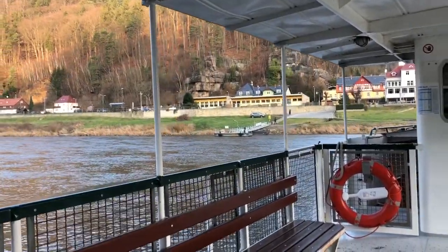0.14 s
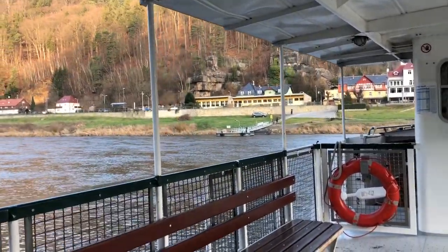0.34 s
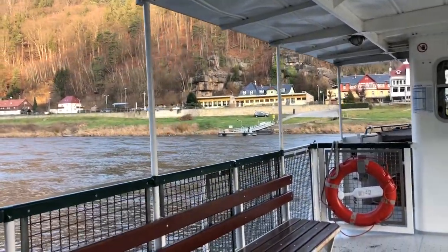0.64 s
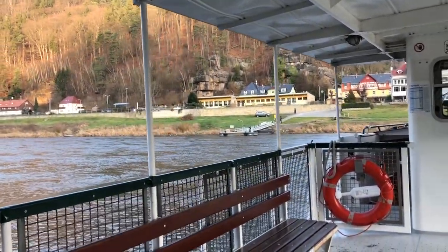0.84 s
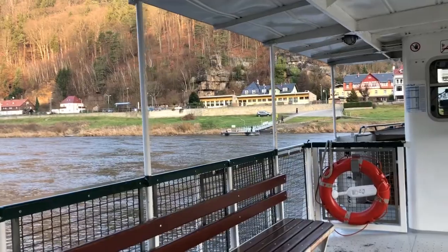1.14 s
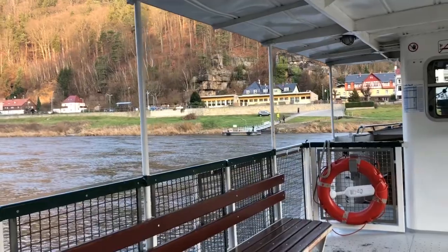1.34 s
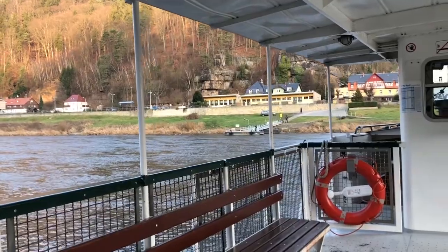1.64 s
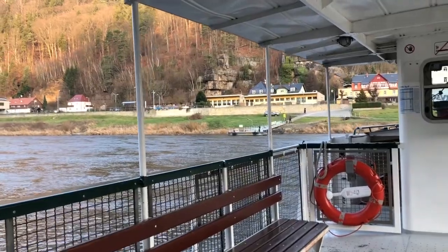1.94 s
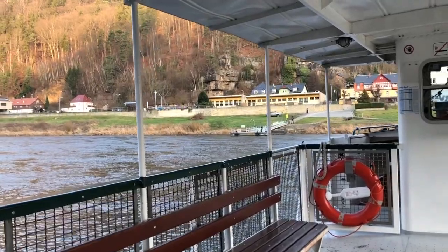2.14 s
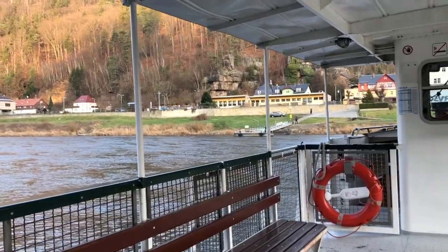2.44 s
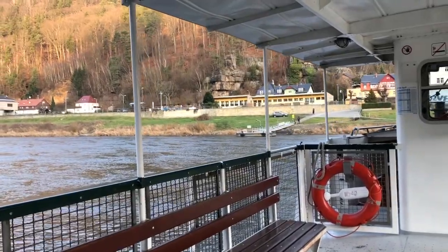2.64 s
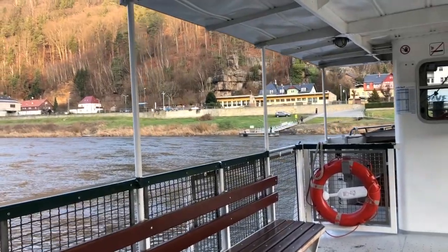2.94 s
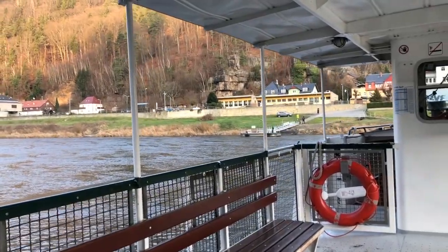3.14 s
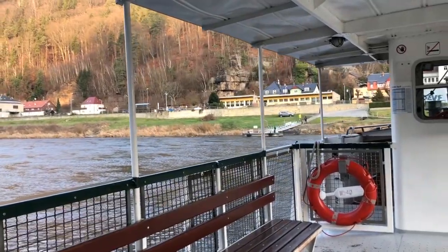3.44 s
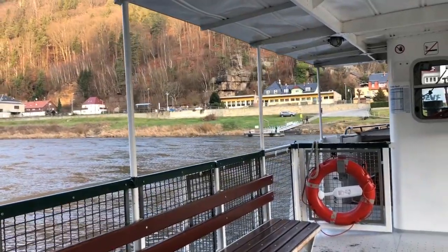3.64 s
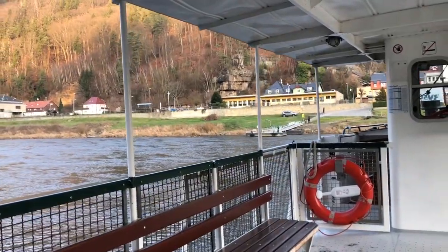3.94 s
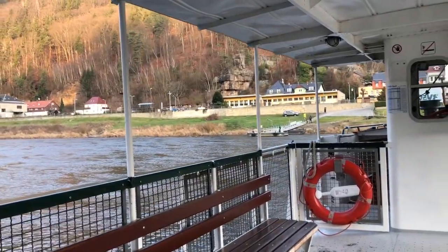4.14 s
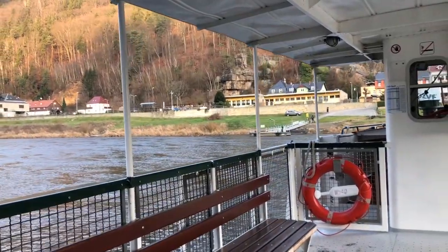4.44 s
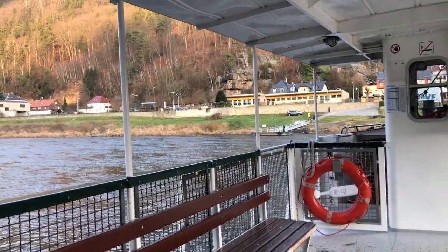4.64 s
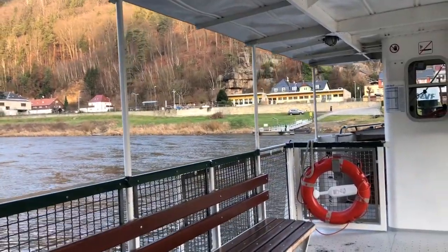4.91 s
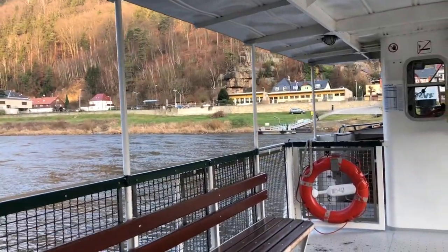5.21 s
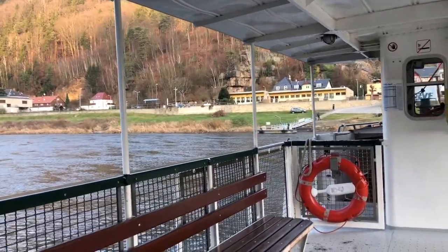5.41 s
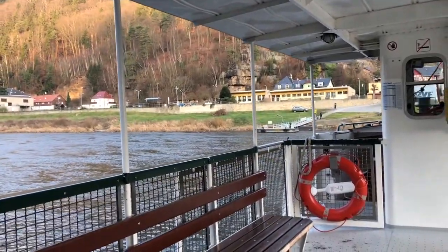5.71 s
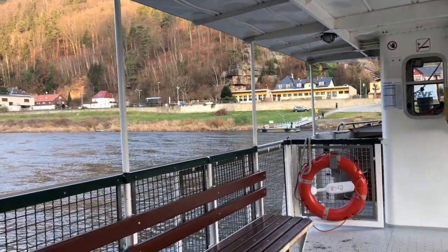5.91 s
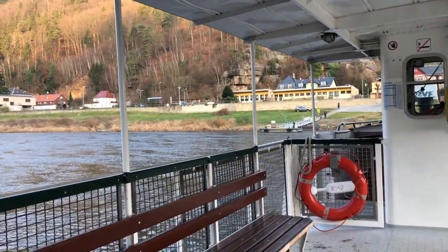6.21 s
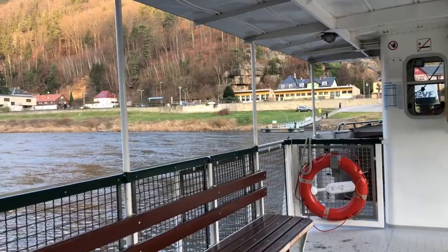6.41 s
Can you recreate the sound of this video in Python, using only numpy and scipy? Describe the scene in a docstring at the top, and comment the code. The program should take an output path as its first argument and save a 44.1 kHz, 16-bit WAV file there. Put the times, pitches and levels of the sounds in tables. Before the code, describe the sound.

Close, mono wind noise dominates: deep rumble, dull thuds, raspy flaps and sharp cracks at uneven intervals. A low boat engine and soft hull wash hum continuously behind, with a very faint, regular high hiss about six times a second. A calmer stretch between one and two and a half seconds exposes the boat, then gusts grow until the loudest burst at the end.

```python
"""Wind gusts buffet a microphone on the open deck of a moving river ferry.
From the start, noise shaped like engine drone and wash runs under wavering machine tones and rumbling wind.
A faint hiss soon joins in regular pulses, and single eddies slap the port with short swings of pressure.
After about a second the wind eases, then builds up again in waves and is strongest at the end.
The hardest slaps crack, and a limiter rounds off whatever overloads the microphone."""
import sys
import numpy as np
from scipy import signal
from scipy.fft import rfft, irfft, next_fast_len
from scipy.io import wavfile
from scipy.ndimage import uniform_filter1d, minimum_filter1d

SR = 44100
rng = np.random.default_rng(int(sys.argv[2]) if len(sys.argv) > 2 else 0)


def wav_record(signal):
    """Record a signal, one row per channel, as 16-bit PCM in the file named by sys.argv[1]."""
    frames = np.transpose(np.atleast_2d(signal))
    bounded = np.clip(frames, -1, 1)
    # unit amplitude maps onto the largest positive 16-bit level
    quanta = np.round(bounded * 32767).astype(np.int16)
    wavfile.write(sys.argv[1], SR, quanta)


N = 289737
TIME = np.arange(N) / SR   # s

# Strength of the wind flowing past the microphone: (time [s], level [dB])
WIND_STRENGTH = [(0, -20.5), (0.5, -20), (0.95, -23), (1.35, -29), (1.85, -27), (2.4, -28), (2.8, -21.5),
                 (3.1, -24.5), (3.6, -18.5), (4.1, -21.5), (4.35, -23), (4.8, -23), (5.15, -17), (5.5, -15),
                 (5.95, -20.5), (6.25, -14.5), (6.57, -9)]
# The strongest eddies sweeping over the port:
# (time [s], level [dB], decay [s], brightness [dB per octave], peak of the core above the level [dB])
STRONG_EDDIES = [(0.144, -17, .011, -1.5, -16), (0.162, -7, 0.0043, 8.5, -2), (0.259, -11.5, .0034, 6, -10),
                 (0.361, -16.5, .012, 1.5, 11), (0.431, -20.5, 0.021, 3, -3), (0.528, -17, 0.0047, 4.5, 10),
                 (0.573, -18, 0.0033, -7, 7), (0.703, -16.5, 0.011, -5, 8), (0.732, -17, 0.0044, 3.5, 9.5),
                 (0.844, -26, 0.017, 4, -7), (0.891, -18, 0.0044, 1, 2), (0.950, -17.5, .0035, 6, -1),
                 (1.016, -21, 0.015, -2, -7), (1.137, -29, 0.017, -1.5, -2), (1.546, -25, 0.024, -6, 8),
                 (1.579, -21, 0.0036, 8, -4), (2.052, -29, 0.026, -8, -7), (2.432, -20, 0.011, -0.5, -7),
                 (2.486, -26.5, .016, -2.5, 2), (2.658, -27.5, 0.0051, -12.5, -6),
                 (2.985, -24, 0.0024, 0.5, 10.5), (3.136, -15, 0.0082, 4.5, 9),
                 (3.258, -15.5, 0.0044, -1, 6.5), (3.457, -25, .012, -4, -3), (3.557, -16.5, 0.0036, -3, 2),
                 (3.618, -20, .005, -2, 4), (3.664, -20, 0.017, 1.5, 7), (3.792, -18.5, 0.0044, 4, 7),
                 (3.942, -26.5, 0.02, -2, -3), (4.008, -18.5, 0.0036, -4.5, 2),
                 (4.129, -17.5, 0.0032, 2, -14), (4.163, -16.5, 0.014, -0.5, 5),
                 (4.244, -24, 0.015, -3, -6), (4.407, -25, 0.015, -3.5, -1), (4.611, -24, 0.034, 0.5, -3),
                 (4.705, -17.5, 0.012, 1, 5), (4.853, -14, 0.0058, 1, 19), (4.879, -16, 0.0054, 3, 4),
                 (4.91, -17.5, 0.003, 2, 6), (4.992, -18.5, .008, -1.5, 0), (5.134, -7, 0.0044, -2.5, 1),
                 (5.16, -15.5, 0.012, 5.5, -3), (5.289, -18, 0.0035, -1, 4),
                 (5.453, -19.5, 0.0036, 14.5, -13), (5.469, -19, 0.017, 6, -3),
                 (5.506, -16.5, 0.015, 1.5, -3), (5.567, -14, 0.0096, 4.5, 4), (5.737, -6.5, 0.012, 4.5, 2),
                 (5.866, -23, 0.011, -4, -7), (6.066, -21, 0.015, 1, 13), (6.111, -22.5, 0.0076, 0, 5),
                 (6.198, -11.5, 0.015, 6, 7), (6.352, -15.5, 0.0061, 3.5, -4), (6.417, -10, 0.014, 4.5, 4),
                 (6.468, -15, 0.011, 5.5, 3), (6.494, -12, 0.012, 6.5, 6), (6.523, -9.5, 0.0058, 10, 2),
                 (6.556, -13, 0.014, 11.5, -4)]

# Noise spectra, from the deepest wind sound to the highest, then the boat and its hiss:
# (frequency [Hz], relative level [dB])
RUMBLE_SPECTRUM = [(20, -48), (31, -19), (48, -1.5), (68, 4.5), (100, -1.5), (125, -5), (180, -19)]
THUMP_SPECTRUM = [(75, -12), (115, -0.5), (150, 0.5), (220, -1), (310, -7), (420, -25.5)]
PORT_SPECTRUM = [(240, -20), (340, -2.5), (420, -1.5), (510, -1), (650, -7.5), (850, -16.5), (1200, -45)]
RASP_SPECTRUM = [(600, -9), (850, 12), (1150, 8.5), (1500, -0.5), (2100, -9), (3000, -38), (4500, -39),
                 (10000, -73)]
BOAT_SPECTRUM = [(25, -36), (45, -33), (75, -3.5), (130, -4), (260, -19), (350, -19), (580, -18),
                 (800, -16), (1150, -20.5), (1800, -22), (2600, -28), (3700, -34.5), (4500, -36.5),
                 (6200, -41.5), (9300, -45.5), (12500, -53.5), (15500, -55)]
HISS_SPECTRUM = [(2500, -31), (4200, 13), (6000, -13), (10000, -14), (11300, -5), (12000, 1), (12600, -2),
                 (13200, -13), (15500, -14)]
# Engine and machine tones: (frequency [Hz], level [dB], half-width [Hz])
MACHINE_TONES = [(72, -50, 9.7), (93, -45, 14), (268, -46.5, 6.7), (429, -48.5, 12), (598.6, -46, 6.3),
                 (1365.5, -51.5, 8.6), (1820, -55.5, 14), (2182, -54, 12), (2316, -56, 10),
                 (2458, -61.5, 9.6), (3220, -62, 28), (4108, -87, 25), (4300, -66.5, 38), (5000, -70, 8)]

BOAT_DB, HISS_DB = -32.5, -54.5
HISS_PERIOD_S, HISS_FIRST_S = 0.172, 0.077
CUTOFF_HZ = 15750

# Lesser eddies come at random: their rate, their level against the wind and its scatter
EDDIES_PER_S, EDDY_DB, EDDY_SCATTER_DB = 15, -8, 2.5
# Their basic decay, and their brightness and its scatter [dB per octave]
EDDY_DECAY_S, EDDY_TILT_DB, EDDY_TILT_SCATTER_DB = 0.0071, -2.5, 3.5

# The core of an eddy swings faster the brighter the eddy is: CORE_HZ holds at zero brightness
CORE_HZ, CORE_OCTAVES_PER_DB, CORE_CYCLES = 402, 0.17, 0.7

# The crack grows faster than the eddy: CRACK_DB is its peak at CRACK_ONSET_DB and zero brightness,
# CRACK_GROWTH is dB per dB of level, CRACK_PER_TILT is dB per dB of brightness
CRACK_DB, CRACK_GROWTH, CRACK_PER_TILT = -21, 1.74, 0.88
CRACK_ONSET_DB = -12
CRACK_HZ, CRACK_CYCLES = 1680, 0.47


def from_db(db):
    """Turn decibels into a gain."""
    return 10 ** (np.asarray(db) / 20)


def rms_one(x):
    """Scale a signal to unit power."""
    return x / np.sqrt(np.mean(x ** 2) + 1e-20)


def in_time(rows):
    """Join the rows of a table by straight lines, one curve per column."""
    s, *columns = np.transpose(rows)
    return [np.interp(TIME, s, column) for column in columns]


def shaped_noise(gain_at):
    """Make unit-power noise whose spectrum follows a function of frequency."""
    size = next_fast_len(N)
    hz = np.maximum(np.arange(size // 2 + 1) * SR / size, 1)
    spectrum = rfft(rng.standard_normal(size)) * gain_at(hz)
    return rms_one(irfft(spectrum, size)[:N])


def noise(colour):
    """Make unit-power noise with a tabled spectrum that falls away beyond its ends."""
    points, db = np.transpose(colour)

    def gain_at(hz):
        skirts = np.minimum(1, np.minimum(hz / points[0], points[-1] / hz)) ** 2
        return from_db(np.interp(np.log(hz), np.log(points), db)) * skirts

    return shaped_noise(gain_at)


def flutter(rate_hz, depth_db):
    """Make a random gain of unit power that changes at about the given rate."""
    wander = shaped_noise(lambda hz: 1 / (1 + (hz / rate_hz) ** 2) ** 2)
    return rms_one(from_db(depth_db * wander))


def deck(x, echo_db=-25, count=16):
    """Floor, roof and cabin wall send back faint early echoes that ripple the spectrum."""
    out = x.copy()
    for delay_s in rng.uniform(0.002, 0.025, count):
        out += from_db(echo_db) * np.roll(x, int(delay_s * SR))
    return rms_one(out)


def boat():
    """Broad drone of the engine, the uneven wash along the hull, and narrow, wavering machine tones."""
    bed = noise(BOAT_SPECTRUM)
    drone = signal.sosfiltfilt(signal.butter(2, 1200, fs=SR, output="sos"), bed)
    bright_part = bed - drone
    wash = np.std(bright_part) * deck(bright_part) * flutter(rate_hz=29, depth_db=0.84)
    out = from_db(BOAT_DB) * (drone + wash)
    for tone_hz, level_db, width_hz in MACHINE_TONES:
        # a narrow band of noise sounds like a tone that wavers
        tone = shaped_noise(lambda hz: 1 / (1 + ((hz - tone_hz) / width_hz) ** 2))
        out = out + from_db(level_db) * tone
    return out


def lesser_eddies(count=200, gust_follow=1.05):
    """Small whirls shed at uneven intervals, stronger in stronger wind; rows like STRONG_EDDIES, no core."""
    s = np.cumsum(rng.gamma(3, 1 / 3, count)) / EDDIES_PER_S
    size, tilt = np.clip(rng.standard_normal((count, 2)), -2, 2).T
    gust_s, gust_db = np.transpose(WIND_STRENGTH)
    mean_db = gust_db.mean()
    carried_db = mean_db + gust_follow * (np.interp(s, gust_s, gust_db) - mean_db)
    level_db = carried_db + EDDY_DB + EDDY_SCATTER_DB * size
    tilt_db = EDDY_TILT_DB + EDDY_TILT_SCATTER_DB * tilt
    rows = np.column_stack([s, level_db, np.full(count, EDDY_DECAY_S), tilt_db])
    return rows[s < N / SR]


def swells(eddies, octaves, stretch, lag_s, rise_share=0.6):
    """Power of the eddies in a band some octaves from the port's own: each rises fast and dies away."""
    power = np.zeros(N)
    for s, level_db, decay_s, tilt_db in eddies:
        near = slice(max(int(s * SR) - SR // 10, 0), int(s * SR) + SR // 4)
        age = (TIME[near] - s - lag_s) / (decay_s * stretch)   # in decay times from the peak
        shape = np.exp(-np.where(age < 0, (age / rise_share) ** 2, age))
        power[near] += from_db(level_db + octaves * tilt_db) ** 2 * shape
    return power


def steady(x, span_s):
    """Even out the power over a short span, so that wind and eddies set the loudness."""
    size = max(int(span_s * SR), 2)
    power = uniform_filter1d(uniform_filter1d(x ** 2, size), size)
    return rms_one(x / np.sqrt(np.abs(power) + 1e-3))


def turbulence(colour, flow_db, eddy_db, eddy_power, span_s):
    """Pressure noise whose power is that of the flow plus that of the eddies riding on it."""
    power = from_db(flow_db) ** 2 + from_db(eddy_db) ** 2 * eddy_power
    return np.sqrt(power) * steady(noise(colour), span_s)


def buffeting(flow_rumble_db=-7.0, flow_thump_db=-10, flow_port_db=-16, flow_rasp_db=-28):
    """Eddies rasp at the port first; the deeper thump and the longest, deepest rumble follow."""
    gust_db, = in_time(WIND_STRENGTH)
    eddies = np.vstack([np.array(STRONG_EDDIES)[:, :4], lesser_eddies()])
    flow_db = gust_db + 20 * np.log10(flutter(rate_hz=42, depth_db=3.5))
    rumble_db = gust_db + flow_rumble_db + 20 * np.log10(flutter(rate_hz=17, depth_db=3.5))

    rumble_swells = swells(eddies, -1.33, stretch=1.43, lag_s=0.01)
    rumble = turbulence(RUMBLE_SPECTRUM, rumble_db, -2.5, rumble_swells, span_s=0.086)
    thump_swells = swells(eddies, -0.6, stretch=1.04, lag_s=0.0027)
    thump = turbulence(THUMP_SPECTRUM, flow_db + flow_thump_db, 3.0, thump_swells, span_s=0.017)
    port_swells = swells(eddies, 0, stretch=0.96, lag_s=0)
    port = turbulence(PORT_SPECTRUM, flow_db + flow_port_db, -0.5, port_swells, span_s=0.0085)
    rasp_swells = swells(eddies, 1, stretch=0.6, lag_s=0)
    rasp = turbulence(RASP_SPECTRUM, flow_db + flow_rasp_db, -13.5, rasp_swells, span_s=0.011)

    # the air tears loose from the edge in quick, uneven flaps
    flaps = flutter(rate_hz=213, depth_db=3.0)
    return rumble + thump + flaps * (port + rasp * flutter(rate_hz=170, depth_db=3.5))


def pulsing_hiss(half_s=0.012):
    """Some turning part hisses briefly once in every revolution."""
    # time from the nearest pulse, before or after it
    from_pulse = (TIME - HISS_FIRST_S + HISS_PERIOD_S / 2) % HISS_PERIOD_S - HISS_PERIOD_S / 2
    pulses = np.exp(-(from_pulse / half_s) ** 2)
    return from_db(HISS_DB) * pulses * noise(HISS_SPECTRUM)


def add_swing(out, s, peak_db, swing_hz, cycles, phase):
    """Add one brief to-and-fro swing of pressure: a sine that swells and fades around time s."""
    near = slice(max(int((s - 10 / swing_hz) * SR), 0), int((s + 10 / swing_hz) * SR))
    turns = (TIME[near] - s) * swing_hz
    envelope = np.exp(-(turns / cycles) ** 2)
    out[near] += from_db(peak_db) * envelope * np.sin(2 * np.pi * turns + phase)


def slaps():
    """A passing vortex core swings the pressure once or twice; strong, bright ones crack the loudest."""
    out = np.zeros(N)
    all_phases = rng.uniform(0, 2 * np.pi, (len(STRONG_EDDIES), 2))
    for (s, level_db, _, tilt_db, core_db), phases in zip(STRONG_EDDIES, all_phases):
        core_hz = CORE_HZ * 2 ** (CORE_OCTAVES_PER_DB * tilt_db)
        add_swing(out, s, level_db + core_db, core_hz, CORE_CYCLES, phases[0])
        crack_db = CRACK_DB + CRACK_GROWTH * (level_db - CRACK_ONSET_DB) + CRACK_PER_TILT * tilt_db
        add_swing(out, s, crack_db, CRACK_HZ, CRACK_CYCLES, phases[1])
    return out


def scene():
    """Wind at the microphone over the running boat, as one channel."""
    return (boat() + buffeting() + pulsing_hiss() + slaps())[None, :]


def record(dry, ceiling=0.88, low_cut_hz=30):
    """The deepest bass is cut, a fast limiter rounds off the hardest buffets, and the top is cut."""
    dry = signal.sosfilt(signal.butter(4, low_cut_hz, "high", fs=SR, output="sos"), dry)
    size = SR // 900   # about a millisecond
    needed_gain = np.minimum(1, min(ceiling, 1) / (np.abs(dry) + 1e-9))
    gain = minimum_filter1d(needed_gain, 2 * size)
    # smooth the gain twice so that it moves without clicks
    limited = dry * uniform_filter1d(uniform_filter1d(gain, size), size)
    return signal.sosfilt(signal.ellip(12, 0.1, 80, CUTOFF_HZ, fs=SR, output="sos"), limited)


dry = scene()
out = record(dry)
wav_record(out)
```